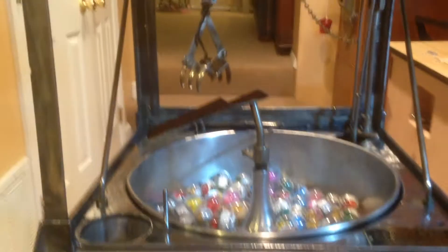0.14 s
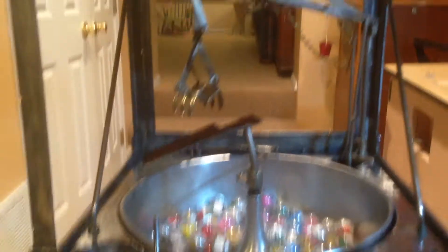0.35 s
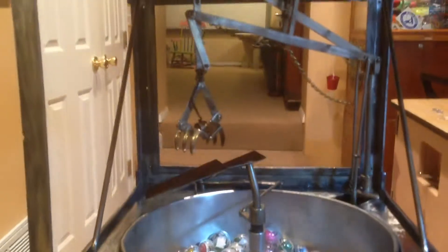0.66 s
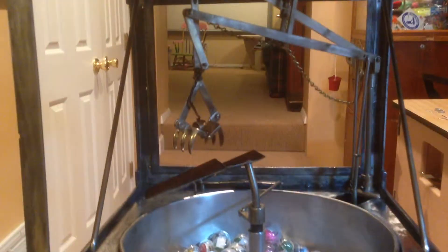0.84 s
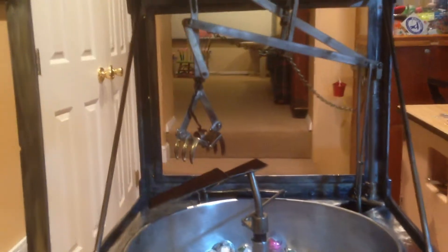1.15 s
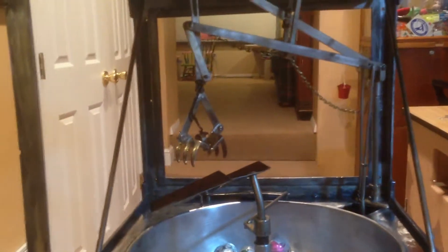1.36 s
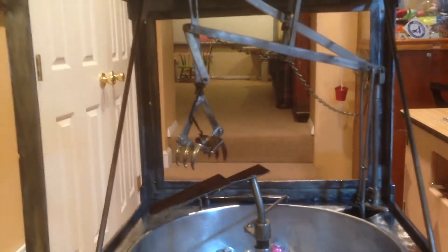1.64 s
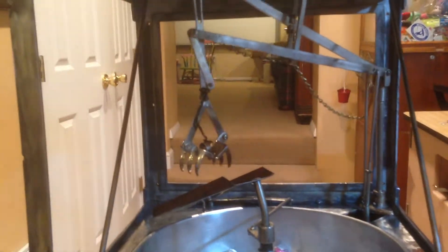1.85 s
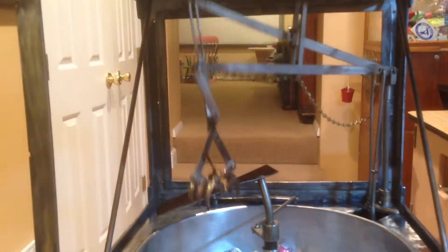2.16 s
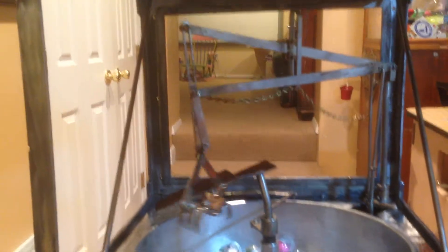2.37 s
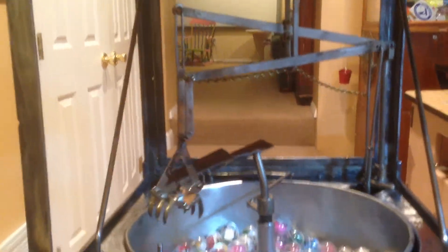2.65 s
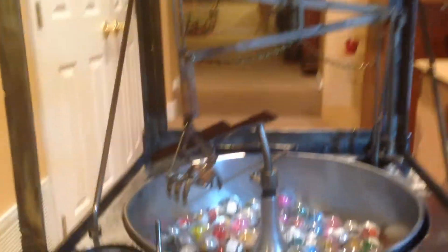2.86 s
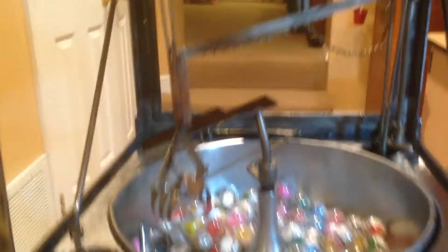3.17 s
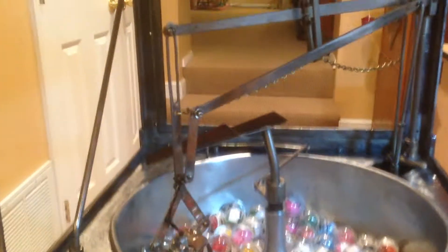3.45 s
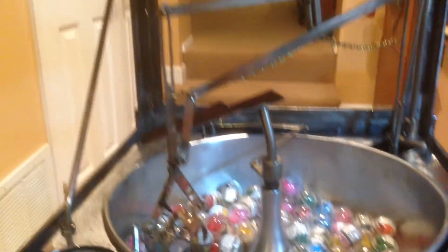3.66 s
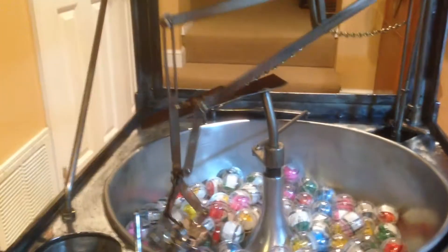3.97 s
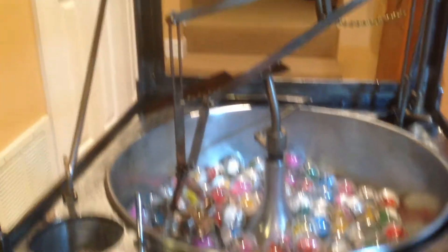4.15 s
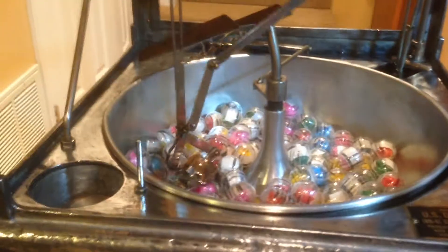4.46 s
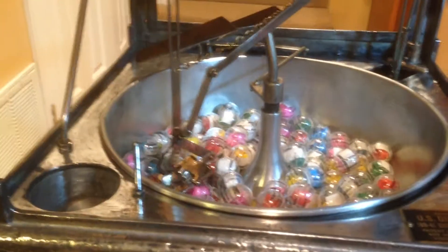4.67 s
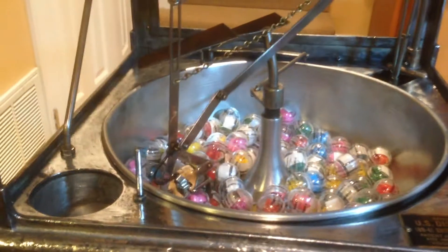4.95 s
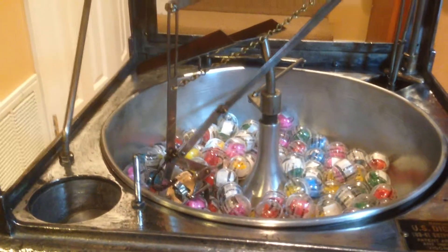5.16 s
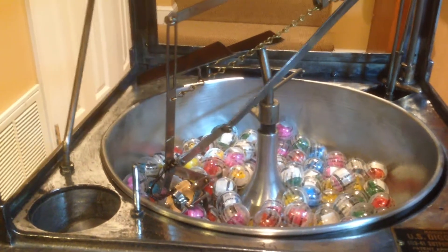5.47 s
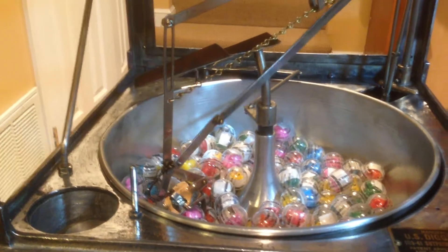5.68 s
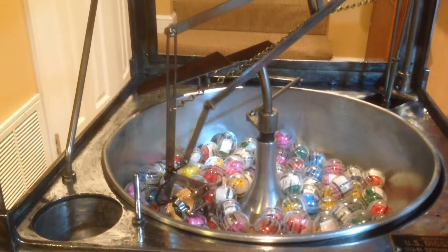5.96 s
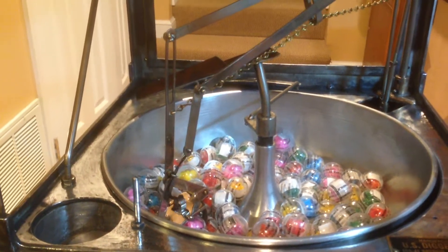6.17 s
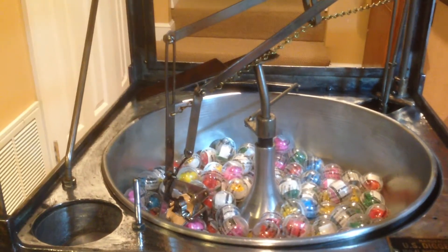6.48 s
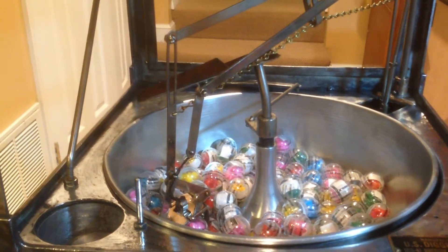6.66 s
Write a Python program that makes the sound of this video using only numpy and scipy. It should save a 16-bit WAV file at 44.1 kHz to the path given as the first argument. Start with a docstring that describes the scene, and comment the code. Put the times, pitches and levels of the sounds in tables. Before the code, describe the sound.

Close by in a quiet room, the ratchet of an old hand-cranked crane machine clicks rapidly, each snap ringing slightly. After about two seconds the steel boom drops with a loud clank, and the claw and chain jangle briefly. The ratchet then carries on more slowly and unevenly, with a few light ticks and dull knocks over a faint rumble of gears.

```python
"""Coin-operated crane machine, close by.

A pawl snaps over a hand-cranked ratchet wheel, ringing louder with a small bounce while the boom
swings, softer and without the bounce while the claw is lowered. In between the boom drops with a
loud clank; claw and chain jangle. Gears rumble in the wooden case, over mains hum and room air."""
import sys
import numpy as np
from scipy import signal
from scipy.fft import rfft, irfft, next_fast_len
from scipy.io import wavfile

SR = 44100
rng = np.random.default_rng(int(sys.argv[2]) if len(sys.argv) > 2 else 0)


def dump(signal):
    """Clip the signal to [-1, 1] and save it as 16-bit WAV at the path in sys.argv[1]."""
    limited = np.clip(np.atleast_2d(signal).T, -1, 1)
    pcm = np.round(limited * 32767).astype(np.int16)
    wavfile.write(sys.argv[1], SR, pcm)


N = 300762
DROP_S = 2.286  # boom drop
AGE = np.arange(SR // 2) / SR  # t/s since a blow
HZ = np.fft.rfftfreq(len(AGE), 1 / SR)

# pawl drops off a tooth, at the crank's uneven pace: t/s
SNAPS = [0.0112, 0.0782, 0.1442, 0.2093, 0.27, 0.338, 0.4154, 0.4862, 0.5566, 0.6252, 0.6924, 0.7708,
         0.8362, 0.892, 1.0729, 1.2104, 1.2771, 1.3474, 1.4042, 1.4542, 1.5019, 1.5499, 1.6044, 1.6525,
         1.7005, 1.7504, 1.8238, 1.876, 1.9268, 1.9749, 2.0221, 2.068, 2.1111, 2.15, 2.191, 2.2392, 2.552,
         2.79, 2.9677, 3.2122, 3.3082, 3.3844, 3.469, 3.58, 3.8939, 3.982, 4.0667, 4.172, 4.3697, 4.4644,
         4.5769, 4.8719, 4.957, 5.034, 5.1652, 5.2822, 5.3794, 5.4504, 5.5324, 5.6311, 5.7157, 5.7849,
         5.855, 5.9396, 6.0645, 6.1444, 6.291, 6.4758, 6.6571, 6.7643]
# snap strength, rising with wheel load: t/s, level/dB
SNAP_LEVEL = [(0, -37.5), (.85, -36.5), (1.25, -37), (1.85, -36), (2.8, -38), (3.55, -35.5), (4.4, -33.5),
              (5.6, -35), (6.8, -34.5)]
# extra gain of the pawl's ring: t/s, gain/dB
RING_GAIN = [(0, -2.5), (.2, 2), (.42, -3.5), (.85, -0.8), (1.07, -3), (1.22, 1), (1.4, 1), (1.58, -1.5),
             (2.25, -2.4), (3.9, -0.2), (5.35, -0.9), (6.8, -2.5)]


def ratchet(works_db=2.5, swing_db=3.5, lowering_db=1, thump_db=-28, scrape_db=-18):
    """Each tooth drops the pawl on nearly the same spot, so the snaps resemble each other."""
    out = np.zeros(N)
    works_bank = np.array([works() for _ in range(8)])
    swing_bank, lowering_bank = pawl_banks()
    frame_bank = np.array([frame() for _ in range(6)])
    frame_band = along([(300, 1), (2300, 0.57), (4200, 0)], HZ)
    treble = along([(600, 0.24), (2200, 1)], HZ)
    for s in SNAPS:
        swinging = s < DROP_S
        db = np.interp(s, *np.transpose(SNAP_LEVEL)) + 0.16 * rng.standard_normal()
        ring_db = np.interp(s, *np.transpose(RING_GAIN)) + 0.67 * rng.standard_normal()
        frame_db = 0.1 * rng.standard_normal()
        snap = recolour(vary(works_bank), frame_db * frame_band + 2.5 * ripple(198.4) * treble)
        if swinging:
            tone = rebound(vary(swing_bank, variety=0.47))
            tone = undb(swing_db) * blow(seat(tone, at_s=0.034, db=-11))
        else:
            tone = undb(lowering_db) * seat(vary(lowering_bank, variety=0.47), at_s=0.039, db=-6)
        hollow = undb(frame_db + (-15 if swinging else -12)) * vary(frame_bank)
        add(out, s - 0.0004, undb(db) * onset(undb(works_db) * snap + hollow, rise_s=0.0018))
        add(out, s, undb(db + ring_db) * onset(tone, rise_s=0.00066))
        add(out, s, undb(db + thump_db + 2 * rng.standard_normal()) * thump())
        climb = scrape()
        add(out, s - len(climb) / SR, undb(db + scrape_db) * climb)
    return out


# pawl and wheel: f/Hz, level/dB with boom swinging, level/dB with claw lowering
PAWL_MODES = [(662.0, -18.0, -16.0), (818.0, -12.0, -21.0), (953.0, -14.0, -17.0), (1254.0, -11.0, -6.5),
              (1405.0, -17.0, -13.0), (1583.0, -33.0, -15.0), (1787.0, -13.0, -19.0), (1857.0, -4.0, -9.0),
              (1992.0, -16.0, -12.0), (2099.0, -12.0, -10.0), (2164.0, -15.0, -9.0), (2665.0, -15.0, -6.5),
              (2702.0, -21.0, -6.0), (3090.0, -2.0, -9.0), (3198.0, -0.0, 0.0), (3235.0, -1.0, -5.0),
              (3284.0, -4.0, -3.0), (3343.0, -3.0, -13.0), (3483.0, -7.0, -6.5), (3553.0, -6.0, -8.5),
              (3677.0, -8.0, -8.0), (5308.0, -16.0, -11.0), (5496.0, -13.0, -11.0), (5626.0, -16.0, -15.0),
              (8742.0, -15.0, -16.0), (9738.0, -18.0, -12.0), (9911.0, -17.0, -13.0),
              (14427.0, -17.0, -14.0), (14583.0, -15.0, -19.0)]


def pawl_banks():
    """Six rings for swinging, six for lowering; the first of each starts its modes more in step."""
    hz, swing_db, lowering_db = np.transpose(PAWL_MODES)
    swing = [pawl(hz, swing_db, t60_s=0.16, spread_cycles=1 if k else 0.45) for k in range(6)]
    lowering = [pawl(hz, lowering_db, t60_s=0.17, spread_cycles=1 if k else 0.6) for k in range(6)]
    return np.array(swing), np.array(lowering)


def pawl(hz, db, t60_s, spread_cycles):
    """The strongest mode rings for t60_s; those below and above die sooner."""
    distance = abs(np.log(hz / hz[np.argmax(db)]))
    decay_s = t60_s * np.exp(-0.9 * np.sqrt(distance))
    return ring(np.transpose([hz, db, decay_s]), scatter_db=2.5, spread_cycles=spread_cycles)


def rebound(tone, lag_s=0.024, db=-9):
    """The pawl bounces off the tooth and lands again, softer."""
    lag = int(lag_s * (1 + 0.0394 * rng.standard_normal()) * SR)
    return tone + undb(db) * np.pad(tone, (lag, 0))[:len(tone)]


def seat(tone, at_s, db, ramp_s=0.0057):
    """The next tooth presses on the pawl and damps its ring."""
    return tone * undb(db * np.clip((AGE - at_s) / ramp_s + 0.5, 0, 1))


def scrape(length_s=0.014, squeak_hz=2800, hiss=0.042):
    """The pawl rubs up a tooth's flank just before it drops."""
    rub = rng.standard_normal(len(AGE))[:int(length_s * SR)]
    squeak = resonate(rub, squeak_hz, q=4)
    return unit(squeak + hiss * rub) * np.linspace(0, 1, len(rub)) * undb(2 * rng.standard_normal())


# dense weak modes of the works: f/Hz, level/dB
WORKS_SPECTRUM = [(200, -27), (320, -8), (400, -7), (520, 2), (850, -3.5), (1060, -7), (1300, -3),
                  (2200, 2.5), (2800, 1.5), (3300, 10.5), (4100, 2.5), (6500, -1.5), (9800, 3),
                  (11500, -2.5), (15000, 0.5)]
# their decay: f/Hz, t60/s
WORKS_DECAY = [(250, 0.16), (1000, 0.26), (3500, 0.16), (7000, 0.13), (14000, 0.081)]


def works(split_hz=1100, low_rise_s=0.0098):
    """A snap shakes the works; the heavy parts carrying the low modes start late."""
    modes = crowd(WORKS_SPECTRUM, WORKS_DECAY, patchy_db=1)
    lows = irfft(rfft(modes) / (1 + (HZ / split_hz) ** 4), len(AGE))
    return modes - lows + onset(lows, low_rise_s)


# hollow after-ring of the frame: f/Hz, level/dB, t60/s
FRAME_MODES = [(1191, 1, 0.09), (1248, 7.5, 0.078), (1333, -5.5, 0.21), (1434, -2.5, 0.13),
               (1489, -10, 0.72), (1490, -1.5, 0.04), (1583, -4.5, 0.15)]


def frame(peak_s=0.033, width_s=0.01):
    """The frame takes up the blow slowly through the axle, swells and hands most of it back."""
    swell = 0.22 + np.exp(-0.5 * ((AGE - peak_s) / width_s) ** 2)
    return blow(onset(ring(FRAME_MODES, scatter_db=1.5) * swell, rise_s=0.0091))


# spans where snaps ping the spring: start t/s, end t/s, level/dB
PING_SPANS = [(.74, .87, -43.5), (1.18, 1.48, -41.5), (1.95, 2.26, -45.5), (4.85, 5.33, -45),
              (6.0, 6.2, -41)]
# return spring: f/Hz, level/dB, t60/s
SPRING_MODES = [(5308, -3, 0.13), (5460, 0, .14), (5510, -1, 0.093), (5690, -2.5, 0.17), (5520, 0, 0.12),
                (5750, -4, 0.11)]


def spring():
    """The pawl's thin return spring gives a bright, beating ping."""
    out = np.zeros(N)
    for start_s, end_s, db in PING_SPANS:
        for s in SNAPS:
            if start_s < s < end_s:
                add(out, s, undb(db) * onset(ring(SPRING_MODES), rise_s=0.0014))
    return out


def disperse(x):
    """Bending waves in steel are slower at low pitch: 1 kHz trails 9 kHz by about 2 ms."""
    size = next_fast_len(N + SR // 10)
    khz = np.fft.rfftfreq(size, 1 / SR) / 1000
    cycles = 3.05 * (2 * np.sqrt(khz) - khz / 3)
    return irfft(rfft(x, size) * np.exp(-2j * np.pi * cycles), size)[:N]


# boom hits its stop and rebounds: t/s, level/dB, contact/s
CLANKS = [(2.2854, -20, 0.0025), (2.288, -22.5, 0.0012), (2.3269, -26, 0.0023)]
# boom bars: f/Hz, level/dB, t60/s
BOOM_MODES = [(335.3, -23, .6), (468, -20.5, 0.46), (912, -16.5, .35), (1163, -7.5, .36), (1193, -7, 0.21),
              (1570, 3, 0.11), (1650, -20, 0.33), (1868, -9.5, 0.2), (2600, -1.5, 0.4), (2690, -1.5, 0.26),
              (3130, -8, 0.17), (3307, 4, 0.21), (3636, 13, 0.06), (3784, -1, 0.16), (4006, -12, 0.32),
              (4290, -11, 0.27), (4930, -16, .28), (5530, -6.5, 0.39), (6420, -5.5, 0.15)]
# boom crash: f/Hz, level/dB
CRASH_SPECTRUM = [(200, -33.5), (700, -6), (1200, 3), (1600, 7), (2200, -1), (3500, 7.5), (4600, 2),
                  (6500, -1.5), (9000, -3.5), (13500, -12), (15000, -12.5)]
# its decay: f/Hz, t60/s
CRASH_DECAY = [(300, 0.38), (1500, 0.1), (4000, 0.48), (14000, 0.29)]


def boom(crash_db=-6, crack_db=-3, thud_db=-29):
    """The steel boom hits its stop: crack, ringing bars, crash and a thud in the case."""
    out = np.zeros(N)
    for s, db, contact_s in CLANKS:
        crack = undb(crack_db) * blow(crowd(CRASH_SPECTRUM, CRASH_DECAY) * fade(0.04))
        bars = ring(BOOM_MODES)
        crash = undb(crash_db) * crowd(CRASH_SPECTRUM, CRASH_DECAY)
        thud = undb(thud_db) * thump(t60_s=0.064)
        add(out, s, undb(db) * onset(crack + bars + crash + thud, contact_s))
    return out


# claw shakes its chain: t/s, level/dB
JANGLES = [(2.409, -26), (2.416, -37), (2.4995, -33.5), (2.593, -35), (2.636, -42), (2.692, -50.5),
           (4.243, -51.5), (4.534, -43), (5.363, -42.5)]
# light, bright metal ticks, two of them just before a ratchet snap: t/s, level/dB
TICKS = [(2.374, -45), (2.395, -36), (2.41, -37), (4.163, -44.5), (4.243, -48), (4.521, -37.5),
         (4.668, -57.5), (4.726, -53.5), (4.798, -61), (4.862, -49)]
# claw: f/Hz, level/dB, t60/s
CLAW_MODES = [(161.6, -8, 0.59), (174, -8.5, 0.77), (345, -13, 0.192), (398.4, -5, 0.25), (469.5, -2, 0.21),
              (906, -2.5, 0.3), (996, -6, 0.65), (1490, -5.5, 0.48), (1550, -0.5, 0.42), (2000, -1.5, 0.24),
              (3696, 7, 0.19), (3706, 2, 0.16), (4100, -3, 0.18), (4320, -10, 0.32), (4530, -20, 0.19),
              (4850, 7.5, 0.12), (5170, 1, 0.21)]
# chain links: f/Hz, level/dB
CHAIN_SPECTRUM = [(150, -20), (400, -10), (700, -3.5), (1500, -1.5), (2600, 0.5), (4100, 5.5), (5400, 2),
                  (7000, -4.5), (10000, -9.5), (15000, -17)]
# their decay: f/Hz, t60/s
CHAIN_DECAY = [(300, 0.28), (4000, 0.2), (14000, 0.13)]


def claw(hits, contact_s, tilt_db_per_octave, chain_db=-2, tines_db=-4):
    """Claw and chain modes ring together: a jangle, or a tick when short in attack and bright."""
    out = np.zeros(N)
    tilt_db = tilt_db_per_octave * np.log2(np.maximum(HZ, 500) / 4500)
    for s, db in hits:
        chain = undb(chain_db) * crowd(CHAIN_SPECTRUM, CHAIN_DECAY, patchy_db=0.5)
        tines = undb(tines_db) * ring(CLAW_MODES)
        add(out, s, undb(db) * blow(onset(recolour(chain + tines, tilt_db), contact_s)))
    return out


# linkage knocks: t/s, level/dB
KNOCKS = [(1.3463, -56), (1.9773, -51), (2.07, -52), (2.111, -50.5), (2.15, -43), (4.0695, -46),
          (4.1723, -46), (4.4645, -44), (4.8707, -50), (5.4512, -52), (6.1445, -53)]


def linkage():
    """Slack in the levers closes with a dull knock on the case."""
    out = np.zeros(N)
    for s, db in KNOCKS:
        add(out, s, undb(db) * thump())
    return out


# wooden case: f/Hz, bandwidth/Hz, level/dB
CABINET_MODES = [(121.3, 8.1, -5), (151.2, 27, 4.5), (179.2, 25.6, 3), (213.8, 14.6, 2), (251, 120, -15),
                 (335, 61, -10)]


def cabinet(x):
    """Boomy case resonances; a second, broad filter steepens the skirts of each."""
    return sum(undb(db) * resonate(resonate(x, hz, q=2), hz, q=hz / width_hz)
               for hz, width_hz, db in CABINET_MODES)


def thump(t60_s=0.0816):
    """A noise burst decaying in t60_s drives the case: a short, dull blow."""
    return blow(cabinet(rng.standard_normal(len(AGE)) * fade(t60_s)))


def rumble(gears_db=-57.5, ref_teeth_per_s=15.3, db_per_doubling=3.5, shudder_db=-51, shudder_t60_s=2):
    """Gears rumble in the case, louder as the crank speeds up; it shudders after the boom drops."""
    t = np.arange(N) / SR
    snaps = np.sort(SNAPS)
    teeth_per_s = np.interp(t, (snaps[1:] + snaps[:-1]) / 2, 1 / np.diff(snaps))
    gears = undb(gears_db + db_per_doubling * np.log2(teeth_per_s / ref_teeth_per_s))
    shudder = (t > DROP_S) * undb(shudder_db - 60 * abs(t - DROP_S) / shudder_t60_s)
    return unit(cabinet(rng.standard_normal(N))) * np.hypot(gears, shudder)


# room tail: f/Hz, level/dB
ROOM_SPECTRUM = [(150, 10), (1500, 4.5), (5000, -13), (15000, -7.5)]
# its decay: f/Hz, t60/s
ROOM_DECAY = [(200, 1), (2000, 0.38), (12000, 0.728)]


def room(x, wet_db=-21):
    """The carpeted room adds a short, soft tail."""
    tail = onset(crowd(ROOM_SPECTRUM, ROOM_DECAY, patchy_db=0), rise_s=0.036)
    tail /= np.sqrt(np.sum(tail ** 2))
    return x + undb(wet_db) * signal.fftconvolve(x, tail)[:N]


# still room air: f/Hz, level/dB
AIR_SPECTRUM = [(20, -10), (50, -7.5), (72, 4.5), (88, -10), (120, -12.5), (220, 3), (310, -15.5),
                (600, -11.5), (1200, -14.5), (3000, -18), (8000, -23.5), (15000, -29)]


def air(level_db=-63):
    """Steady, mostly low room noise."""
    shape = undb(along(AIR_SPECTRUM, np.fft.rfftfreq(N, 1 / SR)))
    return undb(level_db) * unit(irfft(rfft(rng.standard_normal(N)) * shape, N))


# mains hum: f/Hz, rms level/dB
HUM_TONES = [(120, -67)]


def hum():
    """A faint, steady tone from the mains."""
    t = np.arange(N) / SR
    return sum(np.sqrt(2) * undb(db) * np.sin(2 * np.pi * hz * t) for hz, db in HUM_TONES)


def ring(modes, scatter_db=3, spread_cycles=1):
    """Decaying modes; each contact shares out the energy anew, a small spread starts them in step."""
    hz, db, t60_s = np.transpose(modes)[:, :, None]
    gain = undb(db + scatter_db * rng.standard_normal(hz.shape))
    phase = spread_cycles * rng.random(hz.shape)
    return blow((gain * fade(t60_s) * np.sin(2 * np.pi * (hz * AGE + phase))).sum(0))


def crowd(spectrum, decay, patchy_db=2):
    """Countless overlapping modes: noise whose octaves die at their own rates."""
    bunching_db = patchy_db * ripple(170.95) * np.clip(HZ / 4000, 0, 1)
    bins = rfft(rng.standard_normal(len(AGE))) * undb(along(spectrum, HZ) + bunching_db)
    octave = np.log2(np.clip(HZ, 2 ** 7, 2 ** 14))
    out = np.zeros(len(AGE))
    for centre in range(7, 15):
        band = irfft(bins * np.maximum(1 - abs(octave - centre), 0), len(AGE))
        out += band * fade(along(decay, 2 ** centre))
    return blow(out)


def ripple(width_hz):
    """Modes bunch unevenly: random hills over frequency, spread near 1."""
    heights = rng.standard_normal(1024)
    return 1.2 * np.interp(HZ / width_hz, np.arange(len(heights)), heights)


def vary(bank, variety=1):
    """A part's usual response, bank[0], plus a random blend of the rest."""
    count = len(bank) - 1
    others = unit(rng.standard_normal(count)) @ bank[1:] / np.sqrt(count)
    return blow(bank[0] + variety * others)


def recolour(x, db):
    """Weight a blow's spectrum and taper it to zero."""
    return irfft(rfft(x) * undb(db), len(AGE)) * (1 - AGE / AGE[-1])


def resonate(x, hz, q):
    """One band-pass resonance."""
    return signal.lfilter(*signal.iirpeak(hz, q, fs=SR), x)


def along(points, hz):
    """Interpolate (f/Hz, value) points over log frequency."""
    f, value = np.transpose(points)
    return np.interp(np.log(hz + 1), np.log(f), value)


def fade(t60_s):
    """Free decay, 60 dB in t60_s."""
    return undb(-60 * AGE / t60_s)


def onset(x, rise_s):
    """Linear attack."""
    return x * np.minimum(AGE / rise_s, 1)


def blow(x):
    """Scale to rms 1 over the first 40 ms."""
    return x / np.sqrt(np.mean(x[:SR // 25] ** 2))


def unit(x):
    """Scale to rms 1."""
    return x / np.sqrt(np.mean(x ** 2))


def undb(db):
    """Decibels to gain."""
    return 10 ** (np.asarray(db) / 20)


def add(out, s, x):
    """Mix x in at time s."""
    i = max(int(s * SR), 0)
    out[i:i + len(x)] += x[:max(N - i, 0)]


def scene():
    """The machine in its room, mono."""
    machine = disperse(ratchet() + spring() + linkage()) + boom()
    machine += claw(JANGLES, contact_s=0.0036, tilt_db_per_octave=1)
    machine += claw(TICKS, contact_s=0.002, tilt_db_per_octave=12)
    return (room(machine) + rumble() + air() + hum())[None]


def record(dry, top_hz=15250):
    """Steep low-pass."""
    return signal.sosfilt(signal.ellip(8, 0.2, 70, top_hz, fs=SR, output="sos"), dry)


dry = scene()
out = record(dry)
dump(out)
```